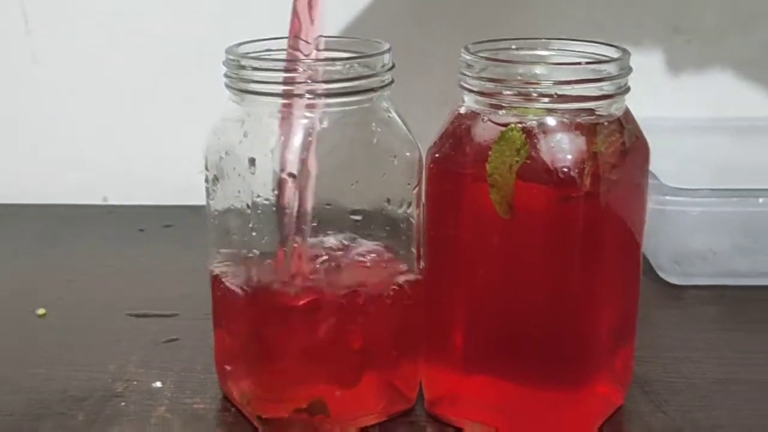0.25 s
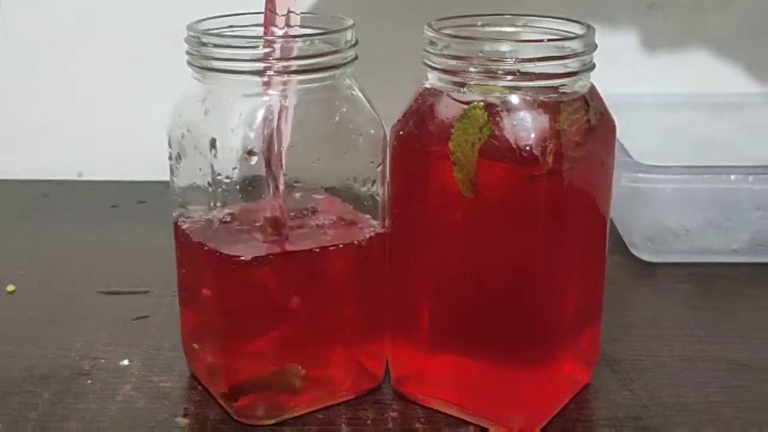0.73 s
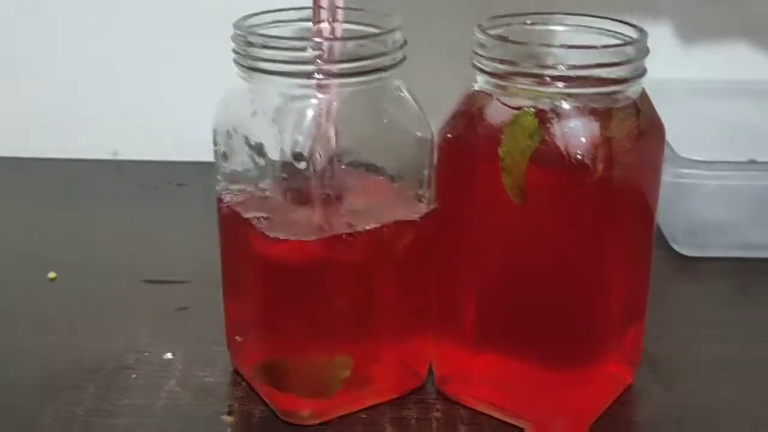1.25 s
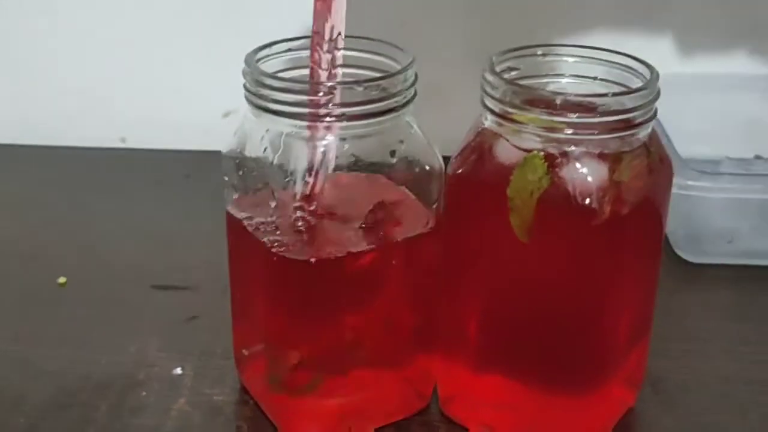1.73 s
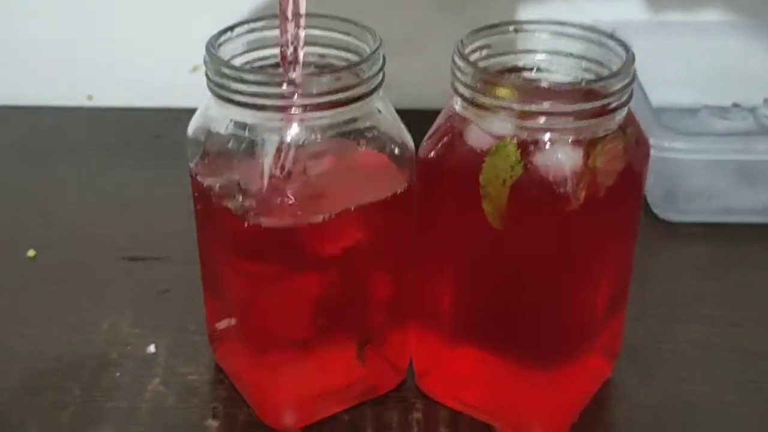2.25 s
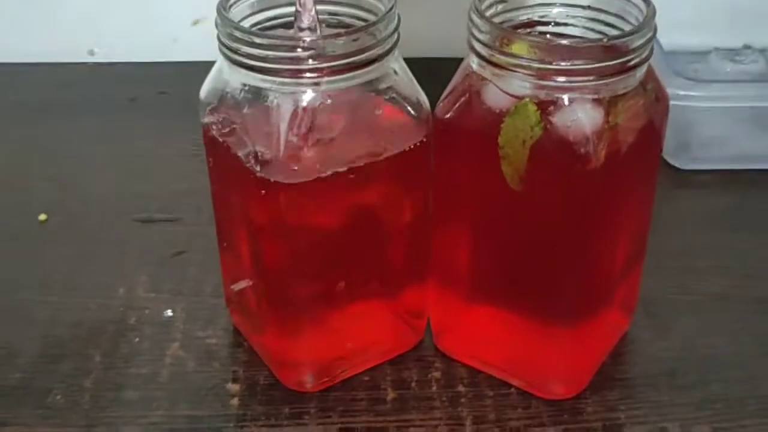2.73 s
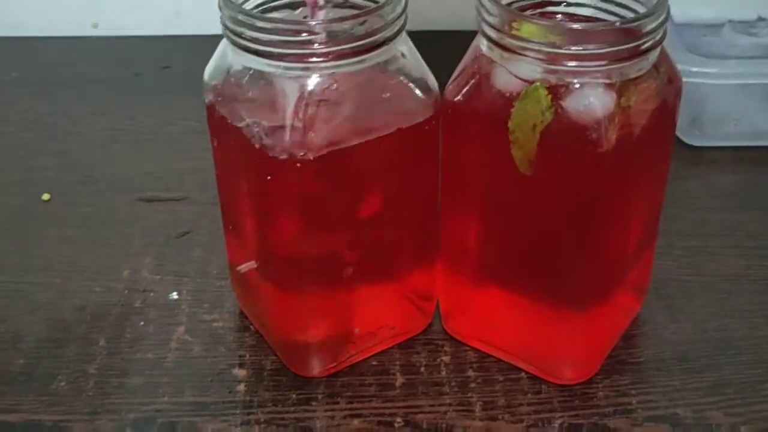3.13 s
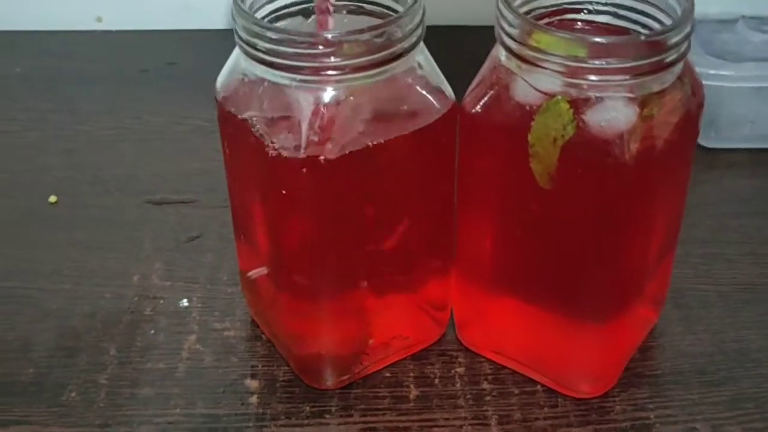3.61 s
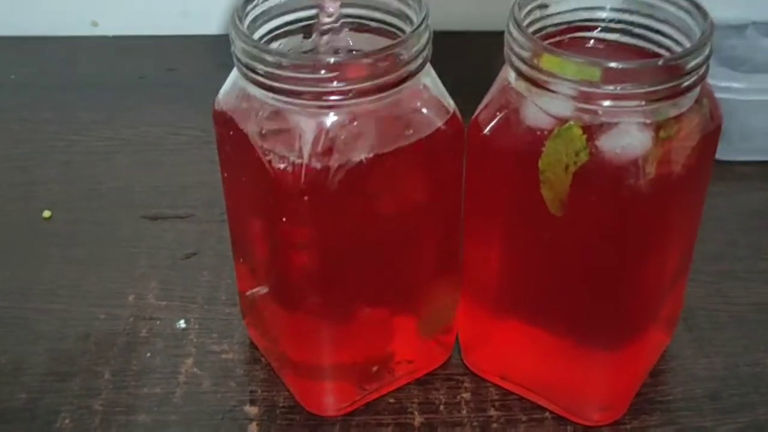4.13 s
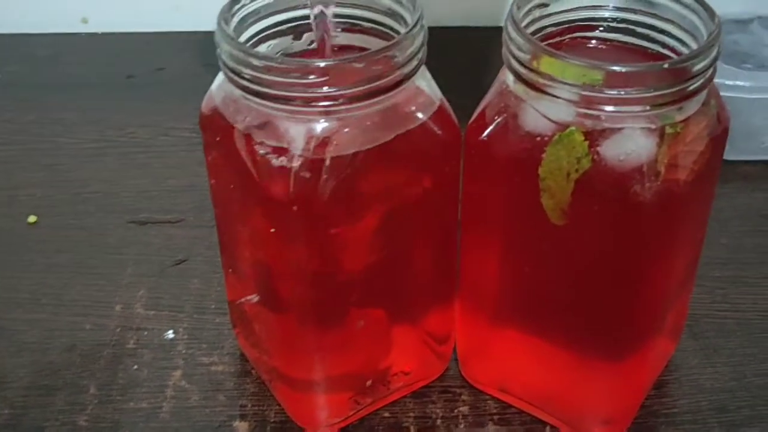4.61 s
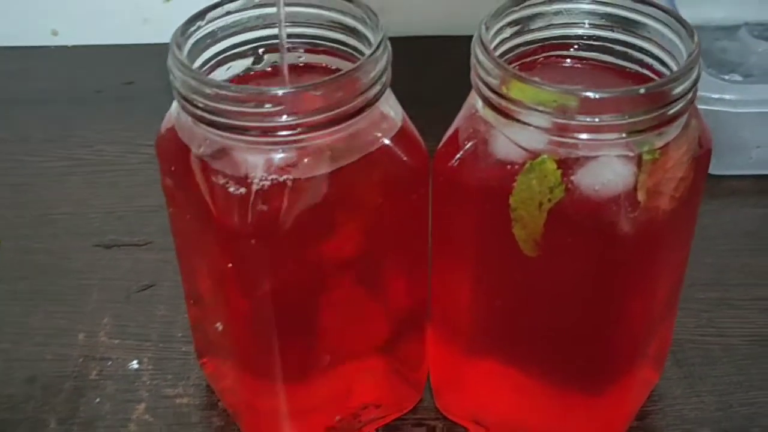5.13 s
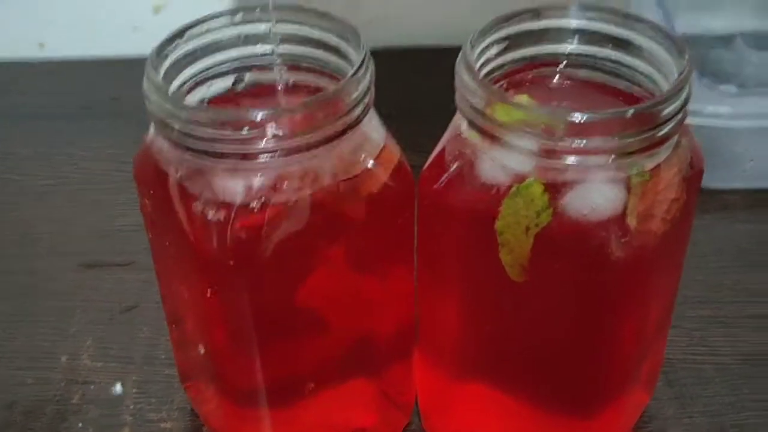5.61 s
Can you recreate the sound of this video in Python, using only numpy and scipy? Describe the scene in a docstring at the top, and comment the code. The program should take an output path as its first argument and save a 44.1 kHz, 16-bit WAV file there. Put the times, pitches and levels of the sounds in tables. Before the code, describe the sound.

A close stereo pickup of a drink being poured into a glass jar in a small, hard kitchen with short echoes. A sharp splash cracks at about 0.2 s, and hollow glugs cluster from 0.3 s, the strongest a round, resonant gulp near 0.8 s. Gurgling continues through 1.8 s amid bright drop smacks and fine watery fizz, flaring near 0.4 and 1.7 s. The glugs climb from about 600 to 1000 Hz, while the glass ringing sinks as the jar fills. At 2.3 s a low, woody thud sounds on the table, with a little slosh. Glugging fades by 3 s, leaving irregular ticking droplets, somewhat busier from 3.4 to 4 s, then sparse and faint. Soft dull bumps come before and after the thud, notably near 2.7 and 5.2 s. Tiny high pings appear at 4.3 and 5.5 s. Quiet low rumble swells briefly around 3.3 s beneath a faint hush.

```python
"""A drink is poured into a glass jar in a hard-walled kitchen, over a low room rumble that comes and goes.
At first drops smack and pop (noise cracks and swarms of short tones) in a fizz of many short random tones;
the jar glugs at a rising pitch (swelling sines), and the glass rings lower as the jar fills (two modes).
At 2.3 s something is set down with a thud (decaying table modes); soft low bumps come before and after.
The stream thins to a trickle, with a few high pings. Echoes follow all but the rumble, boom and hush."""
import sys
import numpy as np
from scipy import signal
from scipy.fft import rfft, irfft, next_fast_len
from scipy.io import wavfile

SR = 44100
rng = np.random.default_rng(int(sys.argv[2]) if len(sys.argv) > 2 else 0)


def wav_out(sig):
    """Save sig, one row per channel (or a flat mono array), as 16-bit PCM at SR to the path in sys.argv[1]."""
    wavfile.write(sys.argv[1], SR, np.round(np.clip(np.atleast_2d(sig).T, -1, 1) * 32767).astype(np.int16))


N = 258426   # length [samples]


def from_db(db):
    """Level law: amplitude is 10 to the power of dB / 20."""
    return 10 ** (np.asarray(db) / 20)


def rms_one(x):
    """Normalization to unit root-mean-square amplitude."""
    return x / np.sqrt(np.mean(x ** 2) + 1e-30)


def in_time(rows):
    """Linear interpolation of each column over the time in the first."""
    times, *columns = np.transpose(rows)
    return [np.interp(np.arange(N) / SR, times, column) for column in columns]


def at_hz(points, hz):
    """Interpolation along a logarithmic frequency axis."""
    point_hz, values = np.transpose(points)
    return np.interp(np.log(hz + 1), np.log(point_hz), values)


def colour(x, spectrum):
    """Linear filtering: each frequency is weighted by a spectrum in dB."""
    size = next_fast_len(N)
    gain = from_db(at_hz(spectrum, np.fft.rfftfreq(size, 1 / SR)))
    return irfft(rfft(x, size) * gain, size)[..., :N]


# Correlation of the two channels in noise: (frequency [Hz], left-right likeness [0 to 1])
STEREO_LIKENESS = [(60, 0.98), (230, 0.74), (890, 0.21), (3400, 0.05)]


def stereo_noise(length):
    """Diffuse-field coherence: two noises agree in the bass and part in the treble; rms 1."""
    size = next_fast_len(length)
    alike = np.clip(at_hz(STEREO_LIKENESS, np.fft.rfftfreq(size, 1 / SR)), 0, 1)
    mid, side = rfft(rng.standard_normal((2, size)))
    spectra = np.sqrt(1 + alike) * mid + np.sqrt(1 - alike) * side * [[1], [-1]]
    return rms_one(irfft(spectra, size)[:, :length])


def drift(rate):
    """Random modulation: straight lines join normal random values of spread 1, `rate` per second."""
    knots = rng.standard_normal(int(N / SR * rate) + 2)
    return np.interp(np.arange(N) / SR * rate, np.arange(len(knots)), knots)


def stirred(hz, width_hz, lumpy_db, rate):
    """Resonance under random drive: lumpy stereo noise passes twice through a resonator; rms 1."""
    radius = np.exp(-np.pi * width_hz / SR)
    zeros = [1, 0, -1]
    poles = [1, -2 * radius * np.cos(2 * np.pi * hz / SR), radius * radius]
    push = stereo_noise(N) * from_db(lumpy_db * drift(rate))
    once = signal.lfilter(zeros, poles, push)
    return rms_one(signal.lfilter(zeros, poles, once))


def add(out, s, sound):
    """Superposition: a short sound is summed in at a time in seconds."""
    i = min(round(s * SR), N)
    out[..., i:i + sound.shape[-1]] += sound[..., :N - i]


def burst(hz, t60, rise_s, glide=0., bend=0.97):
    """Damped oscillation: a sine swells and dies (ever faster if bend > 1), climbing with glide."""
    t = np.arange(round(SR * t60)) / SR
    shape = (1 - np.exp(-t / rise_s)) ** 2 * from_db(-60 * (t / t60) ** bend)
    return shape / shape.max() * np.sin(2 * np.pi * hz * (t + glide * t ** 2))


def swarm(out, s, db, low_hz, high_hz, cycles, spread_s, count):
    """Superposed damped tones of random pitch, size and side; the later, the weaker."""
    for late, pitch, size, side in rng.random((count, 4)):
        hz = low_hz * (high_hz / low_hz) ** pitch
        tone = from_db(db - 10.14 * size - 13.14 * late) * burst(hz, cycles / hz, 1.29 / hz)
        born = s + spread_s * late ** 2
        add(out[0], born + .0002 * side, tone)      # the left channel is mostly later
        add(out[1], born + .00005, tone)


def kitchen(x, wet_db):
    """Reverberation: a dense, exponentially dying tail of echoes follows after a short gap."""
    t60_s, gap_s = 0.29, .003
    t = np.arange(SR // 2) / SR
    tail = stereo_noise(len(t)) * from_db(-60 * t / t60_s) * np.clip((t - gap_s) / 0.00067, 0, 1)
    tail = tail / np.sqrt(np.sum(tail ** 2) / 2)
    echoes = signal.fftconvolve(x * np.ones((2, 1)), tail, axes=1)[:, :N]
    return x + from_db(wet_db) * echoes


# Spectrum of the hush: (frequency [Hz], weight [dB])
HUSH_SPECTRUM = [(20, -6), (236, 0), (819, -7.5), (1300, -24), (5600, -46), (6600, -17.5), (7600, -54),
                 (10500, -28), (13000, -81)]


def hush():
    """Stationary broadband noise: a fixed spectrum shapes a random signal."""
    return from_db(-74) * rms_one(colour(stereo_noise(N), HUSH_SPECTRUM))


def boom():
    """Low resonance under random drive, lumpy in level."""
    return from_db(-76) * stirred(193.3, 92.0, lumpy_db=3.5, rate=8.2)


# Course of the low room rumble: (time [s], level [dB])
RUMBLE_LEVEL = [(0, -73.5), (2.15, -86), (2.4, -78.5), (3.15, -66), (3.35, -55.5), (3.8, -77), (5.86, -71)]


def rumble():
    """Narrow-band resonance under random drive, its level following a curve in time."""
    return from_db(in_time(RUMBLE_LEVEL)[0]) * stirred(74.6, 40, lumpy_db=6.0, rate=6.9)


# Soft low bumps: (time [s], level [dB], pitch [Hz])
SOFT_BUMPS = [(0.874, -61, 227.3), (1.607, -59, 175.4), (2.58, -62, 180.2), (2.737, -53, 173.3),
              (3.576, -61.5, 178.6), (4.297, -65, 241), (5.188, -53, 179), (5.417, -59, 171.2),
              (5.549, -64.5, 374), (5.698, -60.5, 230.5)]


def bumps():
    """Damped oscillation: dull, slow-swelling knocks shake on for a moment at nearby pitches."""
    out = np.zeros((2, N))
    for s, db, hz in SOFT_BUMPS:
        add(out, s - .02, from_db(db) * burst(hz, 0.43, 0.011))
        swarm(out, s, db + 5.0, hz * 0.873, hz * 1.862, cycles=19.2, spread_s=0.41, count=5)
    return out


# Modes of the table: (frequency [Hz], level relative to the blow [dB], decay by 60 dB [s])
TABLE_MODES = [(174.9, 0, 0.37), (261.3, -9.5, 0.17), (328, -6, 0.18), (410.4, -3.5, 0.22)]


def thud():
    """Modal excitation: a soft blow rings the table; the base rocks and stirs it again, the liquid sloshes."""
    blow_s, blow_db = 2.344, -30
    rock_db, slosh_db, rock_s = -1, -9.5, .16
    out = np.zeros((2, N))
    for hz, db, t60 in TABLE_MODES:
        mode_db = blow_db + db
        add(out, blow_s, from_db(mode_db) * burst(hz, t60, 0.0032))
        swarm(out, blow_s + .02, mode_db + rock_db, hz * 0.957, hz * 0.984,
              cycles=0.32 * t60 * hz, spread_s=rock_s, count=5)
    swarm(out, blow_s, blow_db + slosh_db, 470, 1237, cycles=35.0, spread_s=rock_s, count=24)
    return out


# Jolts that set the glass wall ringing: (time [s], level [dB])
WALL_JOLTS = [(0.117, -53.5), (0.171, -44), (0.424, -43), (0.836, -45.5), (1.223, -46), (1.402, -41.5),
              (1.55, -46), (1.63, -47.5), (1.753, -43), (2.03, -62), (2.137, -48), (2.26, -52),
              (2.335, -49.5), (2.557, -50.5), (2.79, -60.5), (3.789, -52.5), (3.935, -61), (4.085, -64.5),
              (4.529, -65.5), (4.675, -63), (4.86, -66), (5.332, -66.5)]


def wall():
    """Mass loading: liquid lowers the ring of the glass; each jolt stirs two modes in a dying flutter."""
    empty_hz, full_hz, load_s = 2277, 1464, 1.044
    overtone, overtone_db = 1.67, -7   # second mode: pitch over the first, level
    out = np.zeros((2, N))
    for s, db in WALL_JOLTS:
        hz = full_hz + (empty_hz - full_hz) * np.exp(-s / load_s)
        swarm(out, s, db, hz * .985, hz * 1.02, cycles=148, spread_s=0.13, count=10)
        swarm(out, s, db + overtone_db, hz * overtone, hz * overtone * 1.04,
              cycles=180, spread_s=.12, count=3)
    return out


# Course of the fizz: (time [s], tone level [dB])
FIZZ_LEVEL = [(0.0, -65.5), (0.39, -51), (0.55, -62.5), (1.66, -53), (1.93, -68.5), (4.24, -82.5),
              (5.86, -72.5)]
# Spectrum of the splash, shared by fizz, froth and drops: (frequency [Hz], weight [dB])
SPLASH_SPECTRUM = [(1200, -0.5), (1330, -27), (1610, -10), (2030, -17.5), (3110, -9.5), (3580, -11),
                   (5210, -13), (6580, -1), (7430, -5.5), (8300, -25), (10700, -11), (13500, -28)]


def fizz_and_froth():
    """Resonators under random impulses: a fizz of many short random tones, and a froth after each drop."""
    tones_per_s, ring_cycles = 2500, 144   # cycles to die by 60 dB
    froth_db, hold_s, froth_t60_s = -17, 0.049, 0.27
    db_per_octave, froth_colour_db = -9.5, 8.5   # fall away from the pop; random favour of pitches
    drift_db, drifts_per_s = 6, 10   # the level of each resonator drifts at random
    t = np.arange(0, N, 64) / SR   # a coarse clock for the levels
    s, db, pop_hz = np.transpose(DROP_HITS)
    since = t - s[:, None]
    decay_db = -60 * np.maximum(since - hold_s, 0) / froth_t60_s
    froth = (since > 0) * from_db(db[:, None] + froth_db + decay_db)
    fizz = from_db(np.interp(t, *np.transpose(FIZZ_LEVEL)))
    born, size, dealt = rng.random((3, 2, N))
    clicks = (born < tones_per_s / SR) * from_db(-18 * size)
    pitches = np.geomspace(1300, 12500, 30) * rng.uniform(.97, 1.03, size=30)
    pitch_index = (dealt * len(pitches)).astype(int)
    out = 0
    for k, hz in enumerate(pitches):
        octaves = np.abs(np.log2(hz / pop_hz))
        favour_db = db_per_octave * octaves + froth_colour_db * rng.standard_normal(len(s))
        level = fizz + from_db(favour_db) @ froth
        radius, angle = from_db(-60 * hz / (ring_cycles * SR)), 2 * np.pi * hz / SR
        mine = clicks * (pitch_index == k) * from_db(drift_db * drift(drifts_per_s))
        mine = mine * np.interp(np.arange(N) / SR, t, level)
        poles = [1, -2 * radius * np.cos(angle), radius * radius]
        out = out + signal.lfilter([0, np.sin(angle)], poles, mine + 1e-18)
    return colour(out, SPLASH_SPECTRUM)


# Glugs of air near 600-1100 Hz, and a few late high pings and chirps:
# (time [s], level [dB], pitch [Hz])
GLUGS_AND_PINGS = [(0.11, -58.5, 820), (0.27, -38.5, 622.2), (0.308, -34.5, 606), (0.333, -36, 616),
                   (0.383, -36, 625), (0.427, -39.5, 912), (0.459, -38, 653), (0.689, -49, 660),
                   (0.77, -22.5, 687), (0.843, -28, 687.3), (0.87, -33, 687.5), (0.924, -37.5, 730),
                   (0.99, -38, 699), (1.106, -39.5, 735), (1.218, -35.5, 715.2), (1.249, -40.5, 766),
                   (1.292, -39, 746), (1.406, -34.5, 707), (1.596, -37.5, 690), (1.755, -37.5, 624),
                   (1.755, -36, 987), (2.035, -58, 945), (2.143, -44, 986), (2.26, -46.5, 1023),
                   (2.344, -39, 980), (2.422, -42, 943), (2.708, -51, 665), (2.738, -40.5, 1007),
                   (2.85, -53.5, 1077), (3.069, -60.5, 1107), (3.985, -55, 969), (4.281, -58.5, 965),
                   (4.276, -61, 4520), (4.282, -62.5, 1804), (5.545, -64, 4990), (5.576, -57, 1772),
                   (5.811, -61.5, 1795)]
# Surges of gurgling, swell and fade each over 30 dB:
# (time of peak [s], peak level [dB], swell [s], fade [s], air-column pitch [Hz])
GURGLE_SURGES = [(0.369, -34, 0.45, 0.28, 632), (.9, -38, 0.34, 0.87, 679), (1.28, -35, 0.26, 0.39, 737.6),
                 (1.658, -45.5, 0.31, 0.41, 702), (2.3, -46, 0.34, 0.42, 970), (2.76, -47, 0.12, 0.25, 998)]


def glugs():
    """Damped resonance: glugs and late pings ring and shed short tones; an air column gurgles in surges."""
    shed_top_db = -36   # greatest level of the shed tones
    small_db = -18.5    # smaller bubbles in the gurgle
    out = np.zeros((2, N))
    for s, db, hz in GLUGS_AND_PINGS:
        t60 = 0.047 * np.exp(.04 * max(db - shed_top_db, 0))   # louder ones swell and ring longer
        add(out, s - .006, from_db(db - 3.0) * burst(hz, t60, 0.12 * t60, glide=0.31, bend=1.59))
        swarm(out, s + 0.017, min(db, shed_top_db), hz * 0.894, hz * 1.223,
              cycles=25, spread_s=0.045, count=4)
    at, peak_db, swell_s, fade_s, air_hz = np.transpose(GURGLE_SURGES)
    for s in rng.uniform(0, at[-1] + fade_s[-1], size=520):
        each_db = peak_db - 30 * np.maximum((at - s) / swell_s, (s - at) / fade_s)
        surge_db, hz = each_db.max(), air_hz[each_db.argmax()]   # the strongest surge leads
        swarm(out, s, surge_db, hz * 0.864, hz * 1.149, cycles=28.5, spread_s=0., count=1)
        swarm(out, s, surge_db + small_db, hz * 1.484, hz * 3.76, cycles=36.0, spread_s=0., count=1)
    return out


# Drops smacking the surface: (time [s], level [dB], pop pitch [Hz])
DROP_HITS = [(0.117, -54.5, 2350), (0.17, -26.5, 6050), (0.4234, -41.5, 4830), (0.693, -41, 2640),
             (0.836, -49, 2650), (0.915, -39.5, 5440), (1.2235, -39, 2750), (1.345, -48, 6840),
             (1.366, -41.5, 6680), (1.403, -38.5, 6200), (1.55, -35, 6300), (1.5918, -34.5, 4220),
             (1.6313, -34.5, 4500), (1.7527, -34, 6250), (1.831, -48.5, 3700), (1.973, -45, 7040),
             (2.1291, -45.5, 3790), (2.301, -46, 3470), (2.3354, -38.5, 7040), (2.412, -42.5, 6940),
             (2.553, -39, 3700), (2.572, -40.5, 6700), (2.729, -47.5, 3720), (3.0677, -52.5, 4000),
             (3.126, -51.5, 3700), (3.342, -55.5, 4400), (3.379, -53, 3500), (3.4465, -41, 6400),
             (3.474, -50, 6470), (3.651, -58.5, 6900), (3.708, -47, 5000), (3.7707, -41, 5400),
             (3.8046, -47, 3310), (3.864, -45.5, 3660), (3.8954, -51, 6800), (3.934, -42, 6500),
             (3.982, -48, 6570), (4.0458, -58.5, 6300), (4.0823, -57, 6700), (4.192, -58, 6800),
             (4.42, -59.5, 6240), (4.4715, -56, 5830), (4.488, -53, 6300), (4.5298, -48.5, 3670),
             (4.6735, -56.5, 6640), (4.768, -56, 6350), (4.8577, -52, 6800), (4.925, -57, 4500),
             (5.2407, -52, 6300), (5.3328, -47.5, 6320), (5.451, -53.5, 6630), (5.6591, -47.5, 7170),
             (5.8108, -49, 7340), (5.83, -51.5, 4280)]


def drops():
    """Impact and bubble resonance: a noise crack, a bright swarm, a pop around its pitch and a duller swarm."""
    crack_db, crack_t60_s, dull_db = -5, 0.018, -11.5
    bright, dull = np.zeros((2, N)), np.zeros((2, N))
    t = np.arange(SR // 20) / SR
    for s, db, hz in DROP_HITS:
        crack = rng.standard_normal((2, len(t))) * from_db(-60 * t / crack_t60_s)
        add(bright, s, from_db(db + crack_db) * crack)
        swarm(bright, s, db, 3500, 12305, cycles=167, spread_s=0.065, count=18)
        swarm(dull, s, db, hz * 0.93, hz * 1.108, cycles=47, spread_s=.04, count=7)
        swarm(dull, s, db + dull_db, 1927, 4130, cycles=34, spread_s=.05, count=7)
    return colour(bright, SPLASH_SPECTRUM) + dull


def scene():
    """Superposition of the background, the table and the jar, the last two with their echoes."""
    background = rumble() + boom() + hush()
    leaning_left = (thud() + bumps()) * from_db([[1.5], [-1.5]])
    table = kitchen(leaning_left, wet_db=-7)
    splashes = kitchen(drops() + wall() + fizz_and_froth(), wet_db=-5.5)
    jar = splashes + kitchen(glugs(), wet_db=-7)
    return jar + table + background


def record(dry):
    """Low-pass filtering: the top is cut, 70 dB down from 13.7 kHz."""
    return signal.sosfilt(signal.cheby2(12, 70, 13700, fs=SR, output="sos"), dry)


dry = scene()
out = record(dry)
wav_out(out)
```